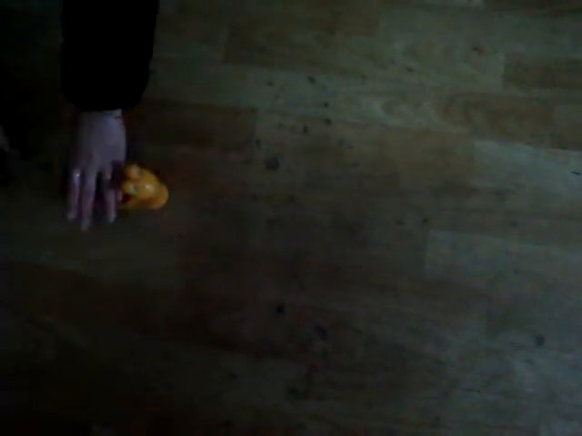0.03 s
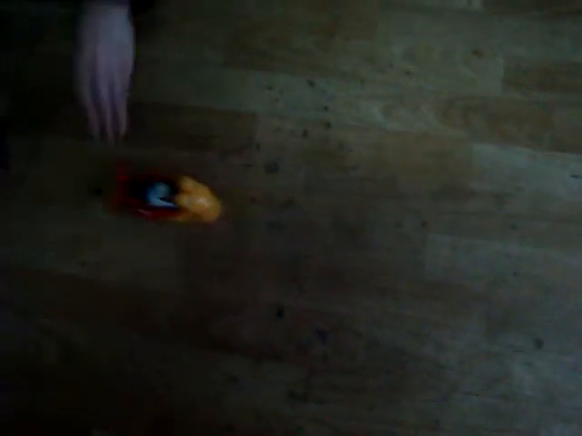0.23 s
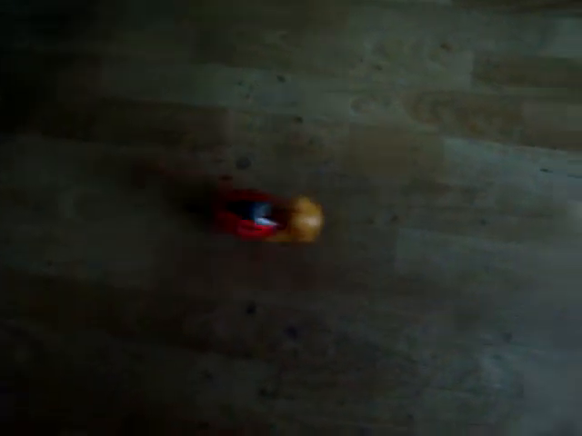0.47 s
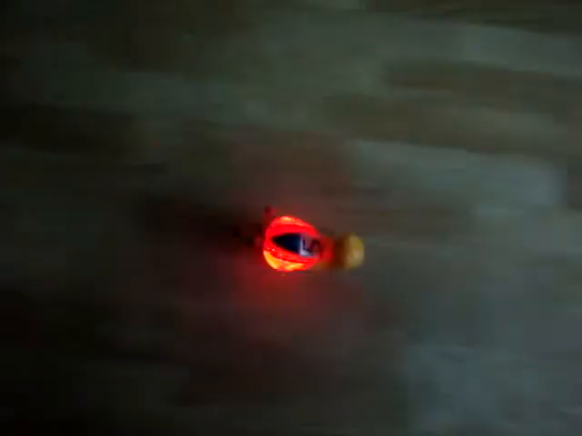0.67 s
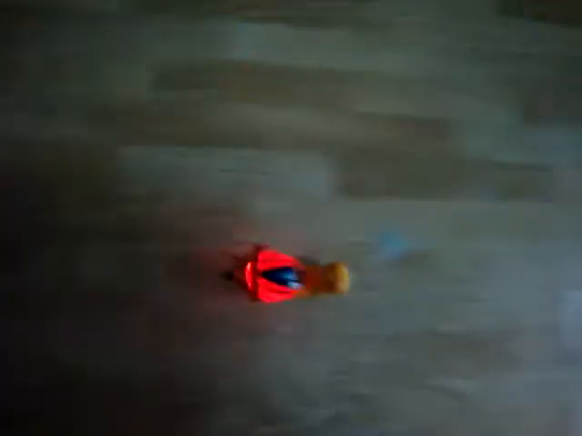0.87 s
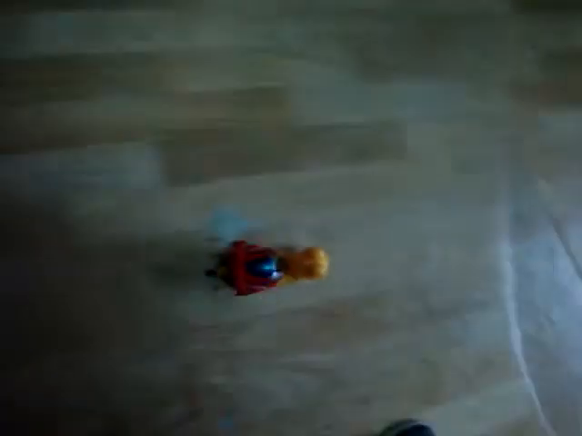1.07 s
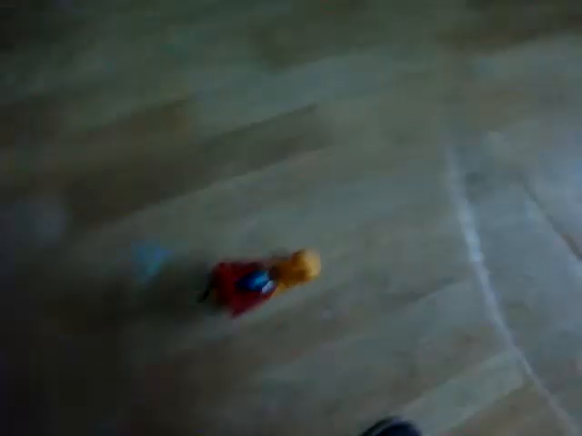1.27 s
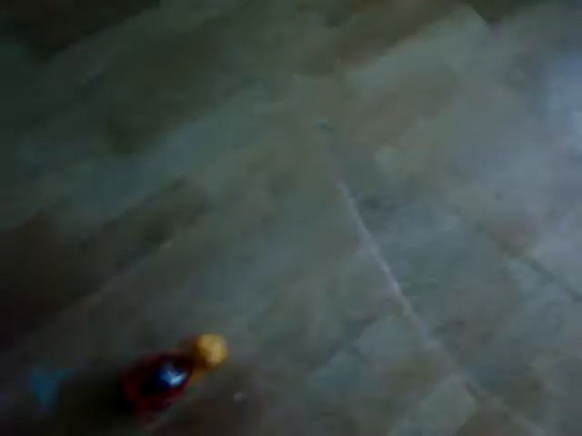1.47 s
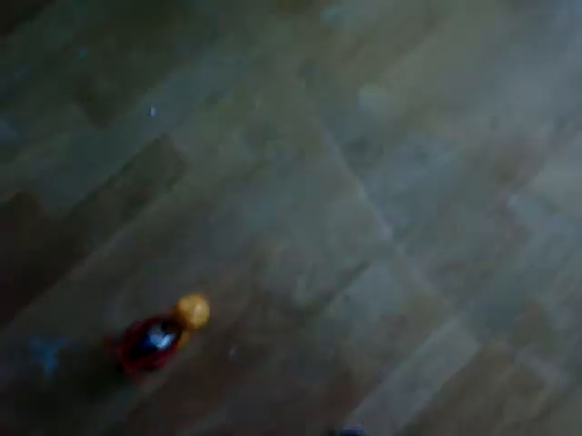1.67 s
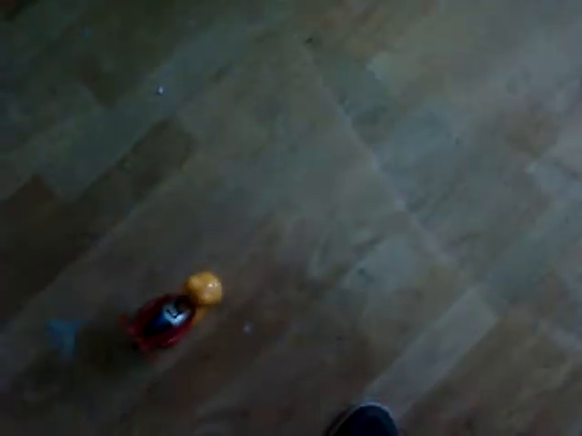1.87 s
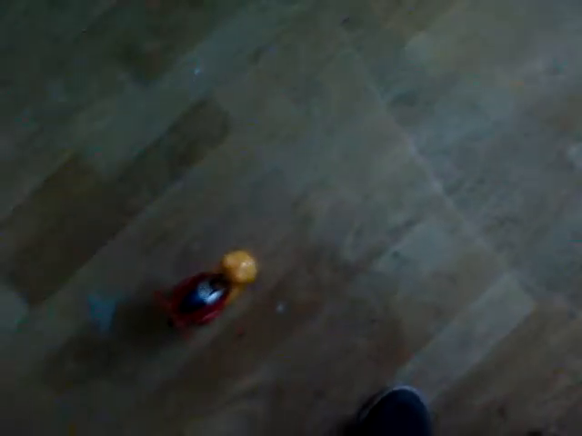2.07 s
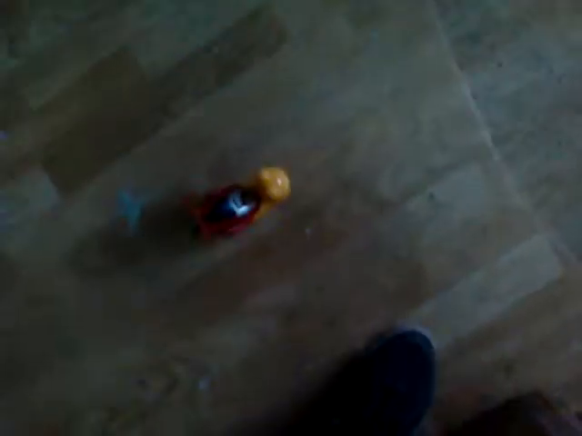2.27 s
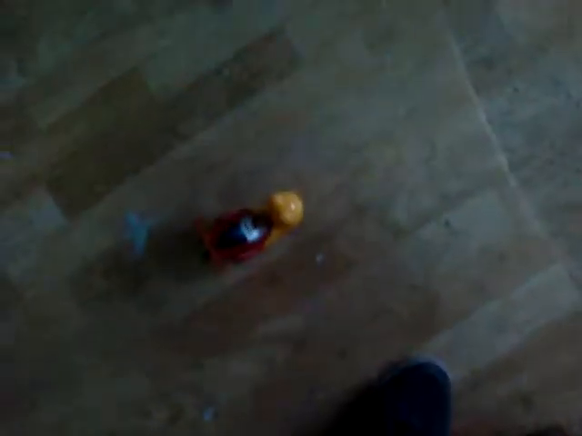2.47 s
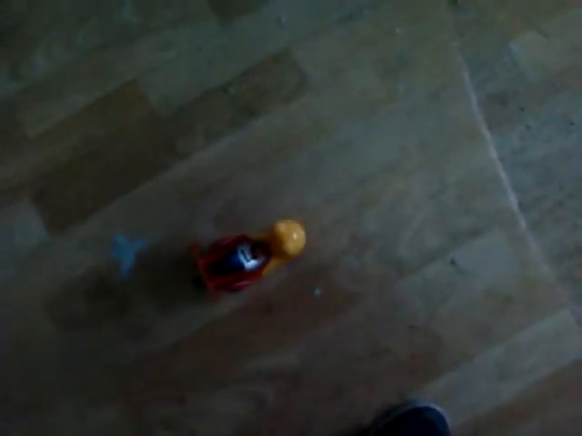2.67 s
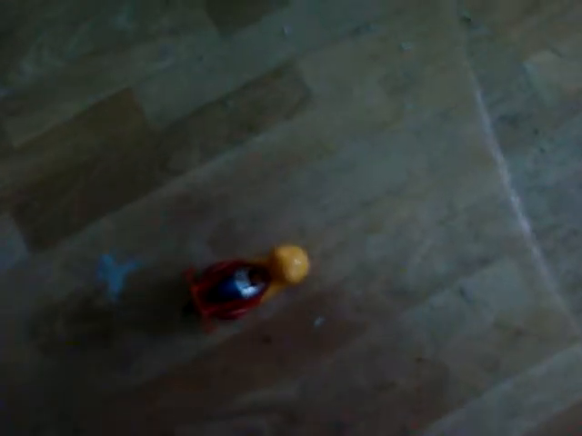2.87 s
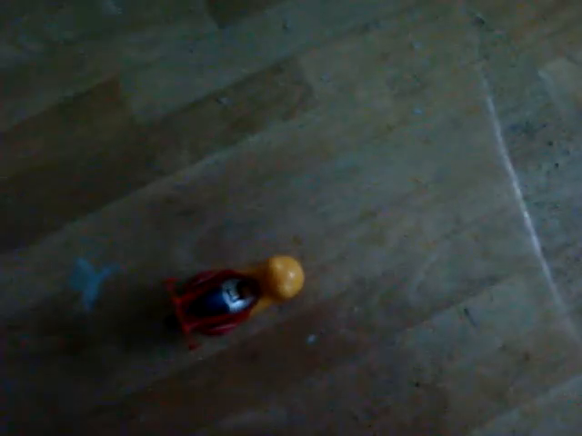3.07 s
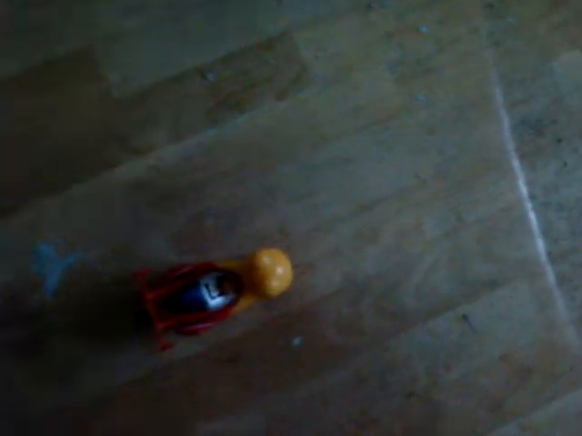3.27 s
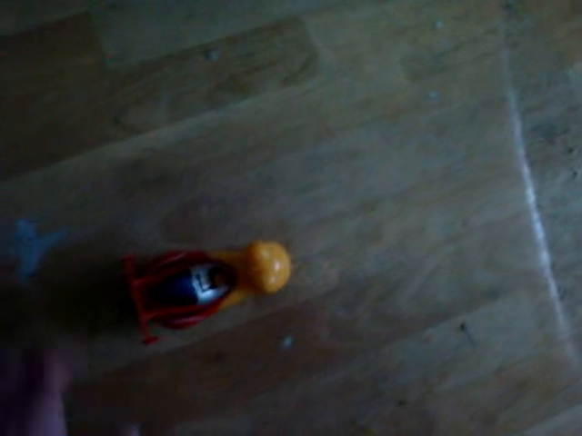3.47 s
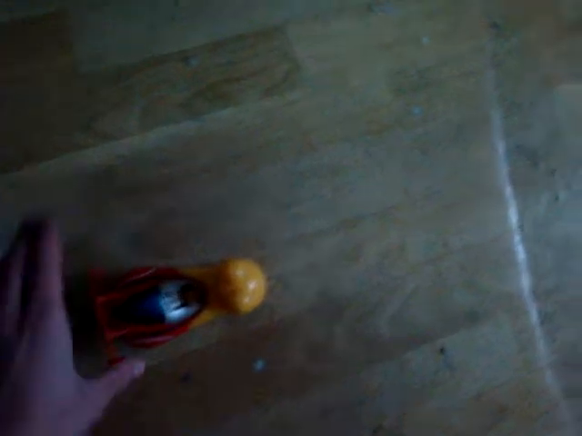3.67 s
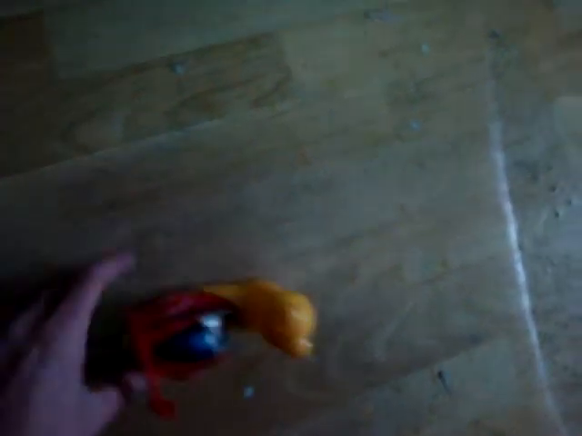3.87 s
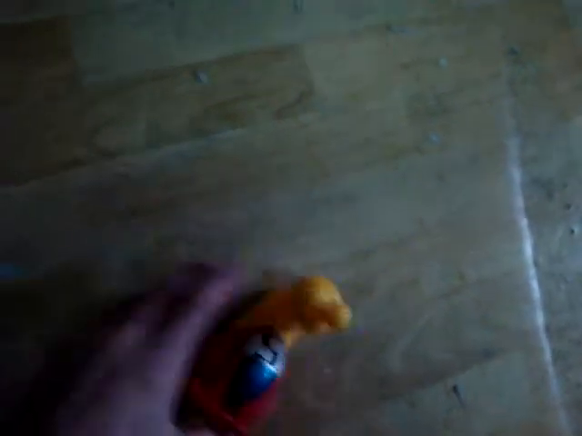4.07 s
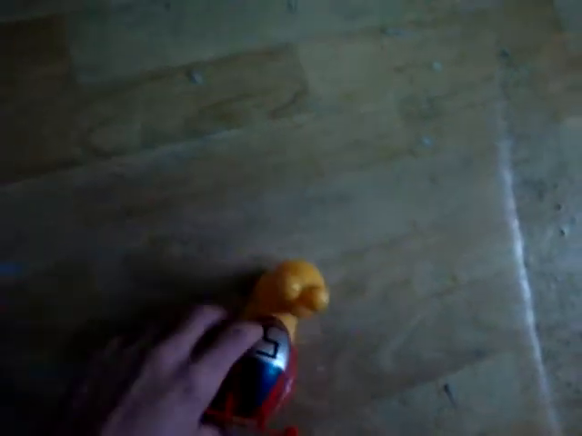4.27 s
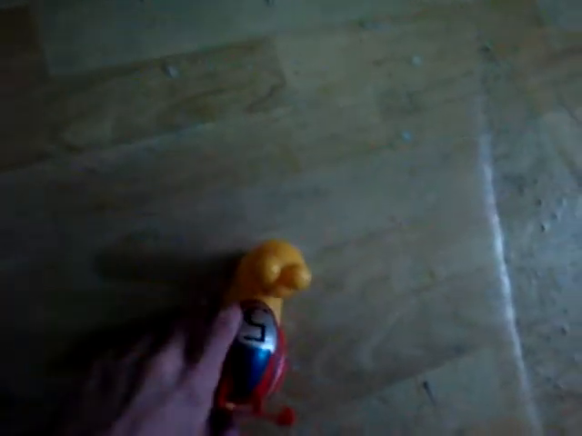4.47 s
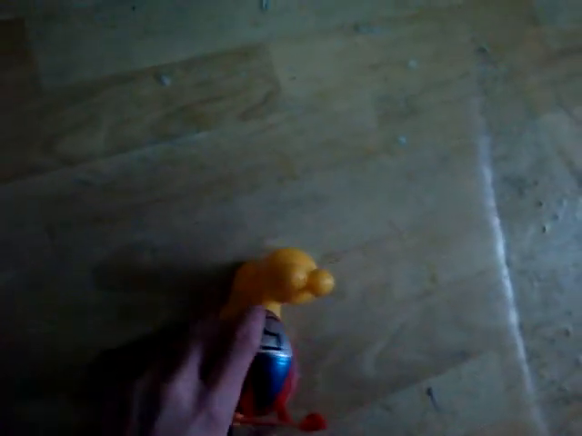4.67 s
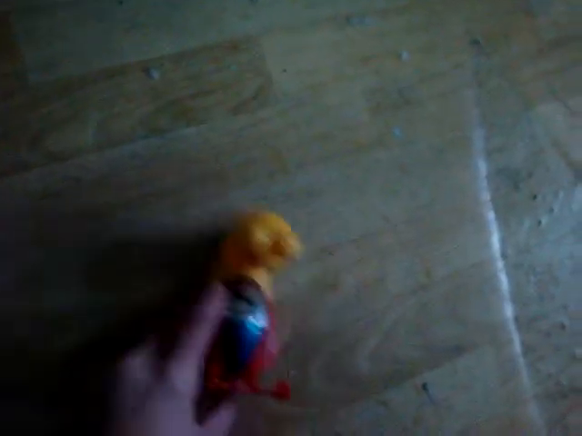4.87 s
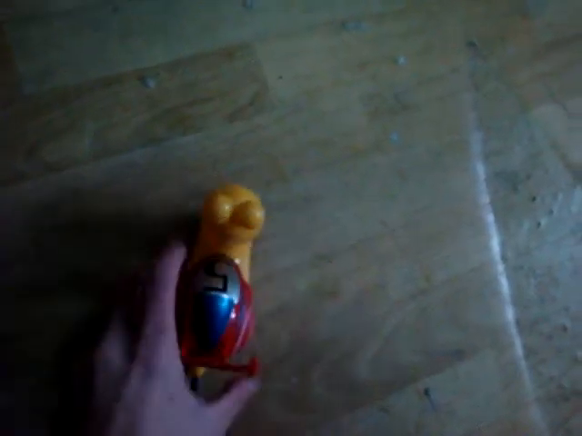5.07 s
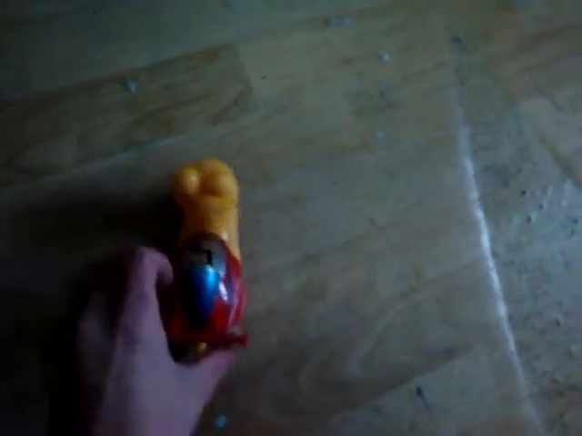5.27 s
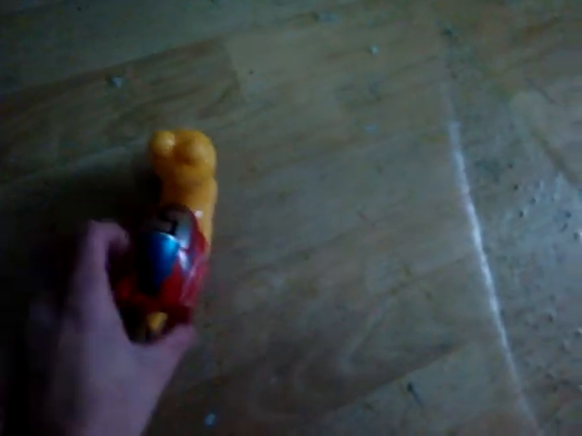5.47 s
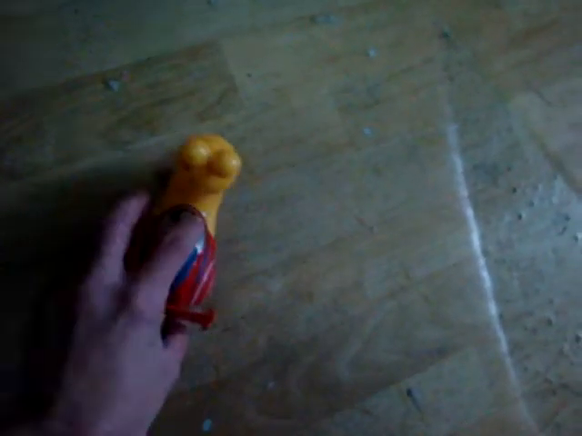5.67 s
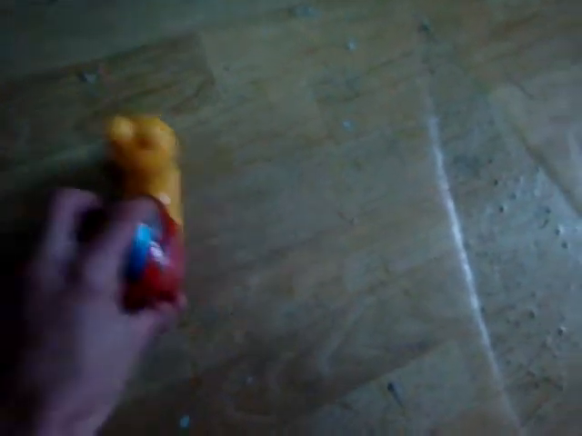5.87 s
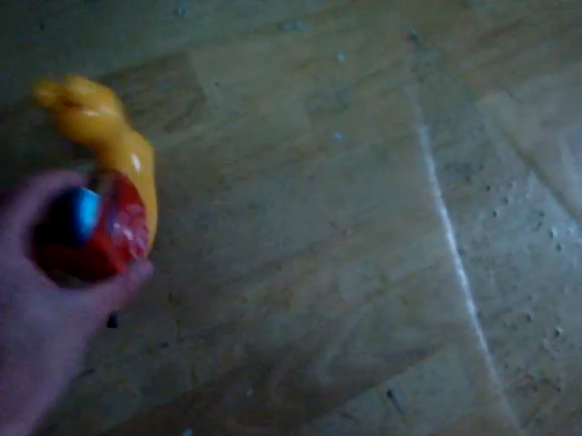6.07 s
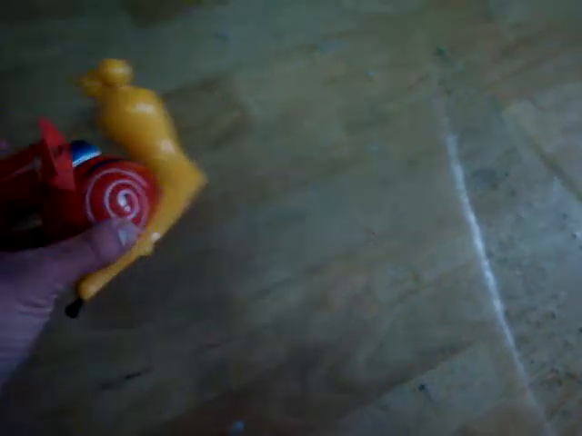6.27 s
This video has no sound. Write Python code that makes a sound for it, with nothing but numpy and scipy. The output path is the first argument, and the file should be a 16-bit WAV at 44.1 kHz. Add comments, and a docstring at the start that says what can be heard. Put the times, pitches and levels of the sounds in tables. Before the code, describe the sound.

A small plastic wind-up toy rattles across a hard floor and stops, then scrapes and taps as a hand turns it.

```python
"""A hollow plastic clockwork snail rattles over a laminate floor until its spring runs down.
The place is a small room, heard from a hand-held phone whose case ticks right at the microphone.
Someone steps after the toy, a sole scuffing and clothes rustling, then turns it by hand: it scrapes,
squeaks and taps the floor. The walls answer the toy briefly; the microphone is thin in the deep bass."""
import sys
import numpy as np
from scipy import signal
from scipy.fft import rfft, irfft, next_fast_len
from scipy.io import wavfile
from scipy.ndimage import map_coordinates

SR = 44100
rng = np.random.default_rng(int(sys.argv[2]) if len(sys.argv) > 2 else 0)


def to_wav(s):
    """Save 16-bit WAV."""
    ch = np.atleast_2d(s).T  # columns
    pcm = np.round(np.clip(ch, -1, 1) * 32767)  # PCM
    wavfile.write(sys.argv[1], SR, pcm.astype(np.int16))


N = 279594

# The toy is pushed off, speeds up and runs down. Each row: time in seconds, wheels in dB, gears in dB.
ROLL_LEVELS = [(0, -21.5, -24), (.1, -38.5, -41.5), (.2, -35.5, -45), (.3, -26, -40), (.39, -29.5, -43.5),
               (.48, -32, -32.5), (.57, -28.5, -30.5), (.72, -26.5, -26.5), (.88, -25, -27.5),
               (.96, -28, -23), (1.08, -28, -33), (1.19, -38, -35), (1.34, -39.5, -39), (1.43, -49.5, -49),
               (1.55, -60, -59)]
# The strongest hollow tone under the rolling toy. Each row: time in seconds, pitch in Hz.
WHIRR_PITCH = [(0, 800), (.2, 863), (.42, 850), (.53, 712), (.66, 794), (.8, 876), (.95, 885), (1.1, 1028),
               (1.5, 983)]
# Resonances of the toy. Each row: centre in Hz, width in Hz, level in dB.
SHELL_MODES = [(1550, 480, 6.5), (1960, 420, 9.5), (2358, 260, 7.5), (2690, 333, 11), (3016, 640, 7.5),
               (3484, 1240, 8), (4326, 480, -1.5)]  # the plastic shell
HOLLOW_MODES = [(691, 268, 3), (850, 252, 6), (1042, 374, 7), (1270, 510, 2.5)]  # the air inside it and the board under it
# Treble of the toy. Each row: frequency in Hz, spectral level in dB.
SMALL_PARTS_SPECTRUM = [(3500, -27.5), (4800, 0), (5800, 4.5), (7000, -0.5), (8500, -1), (10500, -7)]
TAP_SPECTRUM = [(3500, -33.5), (4700, 2.5), (5800, -2), (7500, -6), (10500, -16.5)]
# Wheels jolting over floor joints. Each row: time in seconds, peak in dB, hollow and treble against
# the shell in dB, shell colour in Hz, time to fall 60 dB in seconds.
WHEEL_JOLTS = [(0, -12, -1.5, -5.5, 2300, 0.066), (.022, -15, 4.5, -11, 2590, 0.066),
               (.058, -17.5, -17, -13.5, 2580, .06), (.088, -21.5, -10, -21, 3300, .04),
               (.109, -23, -11, -26, 3220, 0.027), (.145, -23, -11, -15.5, 1700, 0.029),
               (.255, -25.5, -0.5, -12, 3520, 0.055), (.298, -8, -7.5, -9, 2500, .05),
               (.329, -11, -15, -6, 2750, .015), (.385, -13.5, 0.5, -28, 2830, 0.064),
               (.401, -8, -14.5, -9, 2560, 0.05), (.446, -19.5, -8, -16, 2430, 0.047),
               (.495, -7, -19.5, -8, 2720, 0.061), (.515, -10, -3, -25, 2600, 0.029),
               (.54, -13, -7, -8, 2610, 0.047), (.566, -7.5, -6.5, -9.5, 2200, .045),
               (.664, -7.5, -12, -5.5, 2650, 0.088), (.687, -10, -5, -19.5, 2530, .09),
               (.737, -11.5, 2, -22, 2690, 0.073), (.811, -11.5, -13, -10.5, 3450, .06),
               (.824, -7.5, -2, -13.5, 2410, 0.062), (.87, -11, -12.5, -7.5, 2370, 0.072),
               (.919, -12.5, -11, -21, 2440, .05), (.954, -6, -15, -10.5, 2660, 0.062),
               (1.008, -16, -6, -10, 3600, 0.073), (1.046, -21, 0, -9, 1810, 0.093),
               (1.092, -13.5, -11, -14, 2670, 0.028), (1.114, -18.5, -12, -10, 2180, 0.025),
               (1.203, -19, -10, -16, 2640, .04), (1.214, -15, -5.5, -9.5, 1780, .04),
               (1.235, -16.5, -11, -15, 2700, .04), (1.266, -21, -11, -9, 1980, .04),
               (1.314, -24.5, -6, -9.5, 1940, .05)]
# The room's air and the microphone's hiss. Each row: frequency in Hz, spectral level in dB.
ROOM_TONE_SPECTRUM = [(15, -59.5), (25, -16), (59, -23), (250, -7), (322, -5.5), (436, -5.5), (507, -6),
                      (820, -8), (954, -8), (9770, -19.5), (10500, -77.5), (13700, -73.5), (22000, -120)]
# Reverberation of the small room. Each row: frequency in Hz, time to fall 60 dB in seconds.
WALL_DECAY = [(300, 0.14), (2000, 0.3), (9000, 0.015)]
# Low thuds: a soft step, the thump under sharp clicks, and dull knocks.
# Each row: start in seconds, level in dB, pitch in Hz, time to fall 60 dB in seconds.
LOW_THUDS = [(1.14, -50, 90, 0.047), (1.22, -55, 80, 0.16), (1.3, -50, 100, 0.089), (2.231, -33, 60, .01),
             (3.276, -40, 60, 0.014), (4.204, -29, 131, 0.01), (4.791, -35, 360, 0.031),
             (4.898, -27.5, 404, 0.022), (5.461, -29.5, 500, 0.035), (5.53, -29, 273, 0.032)]
# Squeaks of plastic, and a short hollow hum as the toy rolls.
# Each row: start and length in seconds, level in dB, first and last pitch in Hz.
SQUEAKS_AND_HUM = [(1.142, 0.067, -40, 4600, 4800), (4.029, 0.041, -44.5, 3620, 4200),
                   (4.89, 0.055, -34.5, 2780, 2720), (5.877, 0.089, -38, 859, 928)]
# A shoe sliding, and two spells of moving clothes. Each row: time in seconds, level in dB.
SCUFF_LEVELS = [(1.76, -71), (1.81, -47.5), (1.85, -53), (1.89, -47), (1.96, -60.5)]
RUSTLE_SPELLS = [
    [(2.7, -69), (2.8, -53), (3.02, -43.5), (3.34, -49.5), (3.5, -49), (3.86, -46), (4.0, -69)],
    [(6.02, -51), (6.09, -54.5), (6.18, -44.5), (6.34, -45.5)],
]
# Rubbing noise of sole and cloth. Each row: frequency in Hz, spectral level in dB.
SOLE_SPECTRUM = [(200, -25), (500, -3.5), (1500, -5.5), (3000, -9), (6000, -16), (10000, -22.5)]
CLOTH_SPECTRUM = [(88, -41), (150, -27), (358, -4.5), (436, -17), (476, -3.5), (856, 0), (6050, -4.5),
                  (9610, -12), (10500, -27), (13600, -57), (22000, -120)]
# Ticks of the phone case. Each row: time in seconds, peak in dB, low modes against high in dB.
CASE_TICKS = [(1.8193, -34, 0.5), (2.0247, -37, 5), (2.0959, -20, -7.5), (2.1264, -40.5, 4),
              (2.2363, -31.5, 8), (2.4134, -40, -4), (2.7496, -39, 0.5), (2.7716, -36, 6.5),
              (3.275, -16, -3), (3.683, -21.5, 2)]
# Resonances of the phone case. Each row: centre in Hz, width in Hz, level in dB.
CASE_LOW_MODES = [(1400, 890, -6.5), (3100, 1500, -4), (4650, 1230, 0)]
CASE_HIGH_MODES = [(5790, 1400, -11.5), (7140, 490, -4.5), (8230, 1100, -6.5), (9640, 540, -11)]
# Fingers dragging the toy. Each row: start, loudest moment and end in seconds, shell in dB, hollow in dB.
DRAG_STROKES = [(3.729, 3.868, 4.02, -47.5, -51), (4.319, 4.371, 4.46, -41.5, -45.5),
                (4.674, 4.74, 4.77, -53, -52), (4.764, 4.796, 4.855, -43, -43),
                (4.864, 4.95, 4.98, -38.5, -48.5), (5.044, 5.06, 5.04, -61, -43.5),
                (5.171, 5.221, 5.265, -47, -46.5), (5.259, 5.308, 5.4, -44, -47.5),
                (5.43, 5.462, 5.6, -45, -44), (5.597, 5.7, 5.77, -52.5, -46),
                (5.872, 5.946, 6.01, -47, -42)]
# The toy tapping floor and fingers. Each row: time in seconds, peak in dB, hollow and treble against
# the shell in dB, shell colour in Hz.
TOY_TAPS = [(3.865, -27.5, -5, -25, 2760), (3.88, -24.5, -3, -31, 2840), (3.999, -32, 8, -19, 1560),
            (4.009, -29, -5, -20, 3340), (4.09, -30, -12, -17, 3320), (4.167, -35.5, -3, -3.5, 1750),
            (4.201, -6, -4, -12, 1500), (4.222, -12, -6.5, -8.5, 3200), (4.246, -26.5, -5, -27, 2240),
            (4.255, -21.5, -7.5, -17, 2800), (4.524, -36, 5, -22, 1588), (4.544, -23.5, -4.5, -18.5, 3520),
            (4.617, -22, -8.5, -7.5, 2740), (4.868, -23.5, -10, -28, 2830), (4.897, -19, 0.5, -32, 2740),
            (4.974, -25.5, -4, -14, 2800), (5.031, -11.5, -4.5, -9.5, 2780), (5.05, -22.5, -2, -26, 2750),
            (5.06, -20.5, -5, -12.5, 3220), (5.077, -22.5, -7, -5, 3350), (5.101, -31, -6, -19, 1960),
            (5.278, -30.5, 4, -22, 2800), (5.413, -20.5, -2, -26, 2690), (5.447, -32.5, 7, -22, 3100),
            (5.674, -16, -25, 0.5, 3240), (5.716, -25.5, 1, -4, 1990), (5.735, -29, -10, -10, 1740),
            (5.888, -12, -6, -8.5, 3080), (5.902, -26.5, -6, -23.5, 2670), (5.982, -31.5, -9, -22, 2700),
            (6.002, -37, 1, -11, 3730)]


def amp(db):
    """dB to gain."""
    return 10 ** (np.asarray(db) / 20)


def unit(x):
    """Scaled to rms 1."""
    return x / np.sqrt(np.mean(x ** 2) + 1e-20)


def peaked(x):
    """Scaled to peak 1."""
    return x / np.abs(x).max()


def add(track, start, sound):
    """Mixes a sound in at start seconds."""
    part = track[round(start * SR):][:len(sound)]
    part += sound[:len(part)]


def along(points, hz):
    """Reads (Hz, value) points at hz, on a log frequency axis."""
    freqs, values = np.transpose(points)
    return np.interp(np.log(hz + 1), np.log(freqs + 1), values)


def curves(rows):
    """A gate open over the rows' span with 15 ms fades, then each column after the time, per sample."""
    times, *columns = np.transpose(rows)
    t = np.arange(N) / SR
    since_start = t - times[0] + (times[0] == 0)  # no fade at either edge of the scene
    until_end = times[-1] - t + (times[-1] > t[-1] - .02)
    gate = np.clip(np.minimum(since_start, until_end) / .015, 0, 1)
    return [gate] + [np.interp(t, times, column) for column in columns]


def filtered(x, response):
    """x passed through a complex frequency response."""
    size = next_fast_len(len(x) + 4096)
    return irfft(rfft(x, size) * response(np.fft.rfftfreq(size, 1 / SR)), size)[:len(x)]


def normed(response):
    """The response scaled so that white noise keeps its rms."""
    rms = np.sqrt(np.mean(np.abs(response(np.linspace(0, SR / 2, num=1000))) ** 2))
    return lambda f: response(f) / rms


def modes(table):
    """Causal sum of resonances in alternating sign, each passed twice so that the valleys stay dark."""
    def response(f):
        return sum((-1) ** k * amp(db) * (1j * f * width / (hz * hz - f * f + 1j * f * width)) ** 2
                   for k, (hz, width, db) in enumerate(table))
    return normed(response)


def colour(points):
    """A smooth response through (Hz, dB) points."""
    return normed(lambda f: amp(along(points, f)))


def shell_near(focus_hz, db_per_octave):
    """The shell's response with the modes close to focus_hz excited most."""
    return modes([(hz, width, db - db_per_octave * abs(np.log2(hz / focus_hz)))
                  for hz, width, db in SHELL_MODES])


def grit(per_second, spread_db, smooth):
    """Tiny impacts of uneven size over a smooth rubbing noise, rms 1."""
    hits = rng.random(N) < per_second / SR
    size, noise = rng.standard_normal((2, N))
    impacts = hits * np.sign(noise) * amp(spread_db * size)
    return unit(unit(impacts) + smooth * noise)


def flutter(rate):
    """A smooth random curve, rate knots a second."""
    return map_coordinates(rng.standard_normal(int(N * rate / SR) + 4), [np.arange(N) * rate / SR])


def burst(rise, t60, crack):
    """Noise that swells and dies (times in seconds), with one sharp blow just after first contact."""
    t = np.arange(SR // 8) / SR
    swell = (1 - np.exp(-t / max(rise, 1e-4))) ** 2
    out = swell * amp(-60 * t / t60) * rng.standard_normal(len(t))
    out[round(2 * rise * SR)] += crack
    return out


def knock(hollow_db, treble_db, colour_hz, rise, t60, crack, spectrum):
    """A blow shakes the hollow, the small parts and the shell modes near the struck spot's colour."""
    shell = filtered(burst(rise, t60, crack), shell_near(colour_hz, db_per_octave=9))
    hollow = filtered(burst(rise, 1.27 * t60, crack), modes(HOLLOW_MODES))
    treble = filtered(burst(rise, 1.1 * t60, crack), colour(spectrum))
    return peaked(shell + amp(hollow_db) * hollow + amp(treble_db) * treble)


def wheel_rumble():
    """Wheels shake the hollow; its strongest tone shifts as the toy passes over the boards."""
    whirr_width_hz, whirr_db = 120, 4
    _, pitch = curves(WHIRR_PITCH)
    wheels = grit(2500, spread_db=6.5, smooth=.61)
    whirr = np.zeros(N)
    for hz in np.geomspace(pitch.min(), pitch.max(), num=6):  # the glide fades from band to band
        closeness = amp(-60 * abs(np.log2(hz / pitch)))
        whirr += closeness * filtered(wheels, modes([(hz, whirr_width_hz, 0)]))
    return filtered(wheels, modes(HOLLOW_MODES)) + amp(whirr_db) * unit(whirr)


def gear_rattle():
    """Gear teeth shake the small parts and the shell, which rocks so that its modes take turns."""
    rock_db, floor_damping, small_parts_db = 2.5, 1.18, -8
    teeth = grit(2500, spread_db=5, smooth=.8)
    shell = np.zeros(N)
    for hz, width, db in SHELL_MODES:
        ring = filtered(teeth, modes([(hz, floor_damping * width, 0)]))
        shell += amp(db + rock_db * flutter(45)) * ring
    return unit(shell) + amp(small_parts_db) * filtered(teeth, colour(SMALL_PARTS_SPECTRUM))


def rolling():
    """Wheels and gears chatter unevenly across the floor until the spring runs down."""
    gate, wheels_db, gears_db = curves(ROLL_LEVELS)
    chatter = amp(1.4 * flutter(70))
    wheels, gears = unit(wheel_rumble()), gear_rattle()
    return gate * chatter * (amp(wheels_db + 1.3 * flutter(45)) * wheels + amp(gears_db) * gears)


def jolts():
    """Floor joints shake the loose parts; the longer a jolt rings, the more slowly it swells."""
    out = np.zeros(N)
    for start, db, hollow_db, treble_db, hz, t60 in WHEEL_JOLTS:
        jolt = knock(hollow_db, treble_db, hz, rise=.06 * t60, t60=t60, crack=3.14,
                     spectrum=SMALL_PARTS_SPECTRUM)
        add(out, start, amp(db) * jolt)
    return out


def room_tone():
    """Air and microphone hiss, nearly steady under everything."""
    return amp(-53.5 + .6 * flutter(2)) * filtered(rng.standard_normal(N), colour(ROOM_TONE_SPECTRUM))


def wall_reflections(sound):
    """A short room echo, its tail renewed every quarter second so no pitch keeps ringing."""
    step = round(.25 * SR)
    out = np.zeros(N)
    for start in range(0, N, step):
        hz, t, noise = signal.stft(rng.standard_normal(SR // 2), SR, nperseg=256)
        decay = amp(-60 * t / along(WALL_DECAY, hz)[:, None])  # each frequency dies at its own speed
        _, tail = signal.istft(noise * decay, SR, nperseg=256)
        delayed = np.pad(sound[start:start + step], (200, 0))
        add(out, start / SR, signal.fftconvolve(delayed, tail / np.linalg.norm(tail)))
    return out


def thuds():
    """A step, the thump under clicks and dull knocks: damped low tones with a soft start."""
    out, t = np.zeros(N), np.arange(SR // 4) / SR
    for start, db, hz, t60 in LOW_THUDS:
        envelope = amp(db - 60 * t / t60) * (1 - np.exp(-t * 12 / t60))
        add(out, start, envelope * np.sin(2 * np.pi * hz * t))
    return out


def squeaks_and_hum():
    """Short, rough, wavering glides: high ones are plastic squeaking, the low one the toy's hollow hum."""
    out = np.zeros(N)
    waver, roughness = 1 + .03 * flutter(300), amp(4.8 * flutter(250))
    for start, length, db, first_hz, last_hz in SQUEAKS_AND_HUM:
        progress = np.linspace(0, 1, num=round(length * SR))
        span = round(start * SR) + np.arange(len(progress))
        hz = (first_hz + (last_hz - first_hz) * np.sqrt(progress)) * waver[span]
        envelope = amp(db) * roughness[span] * np.sin(np.pi * progress)
        add(out, start, envelope * np.sin(2 * np.pi * np.cumsum(hz) / SR))
    return out


def scuff_and_rustle():
    """A sole slides on the floor, then cloth on cloth: smooth hiss with fine grain."""
    grain = amp(.43 * flutter(23)) * grit(4000, spread_db=2, smooth=4.4)
    scuff_gate, scuff_db = curves(SCUFF_LEVELS)
    scuff = scuff_gate * amp(scuff_db) * filtered(grain, colour(SOLE_SPECTRUM))
    cloth_gain = sum(gate * amp(db) for gate, db in map(curves, RUSTLE_SPELLS))
    return scuff + cloth_gain * filtered(grain, colour(CLOTH_SPECTRUM))


def phone_ticks():
    """The phone case gives short dry cracks right at the microphone."""
    out = np.zeros(N)
    for start, db, low_db in CASE_TICKS:
        high = filtered(burst(rise=.001, t60=.019, crack=4.1), modes(CASE_HIGH_MODES))
        low = filtered(burst(rise=.00059, t60=.019, crack=1.2), modes(CASE_LOW_MODES))
        add(out, start, amp(db) * peaked(high + amp(low_db) * low))
    return out


def dragging():
    """The shell slips over the laminate in grains; each stroke swells and fades, the main mode on top."""
    main_mode_hz = SHELL_MODES[3][0]
    start_db, end_db, small_parts_db = -5, -9.5, -17
    slips = grit(2000, spread_db=6.5, smooth=.78) * amp(2.1 * flutter(60))
    hollow = filtered(slips, modes(HOLLOW_MODES))
    shell = filtered(slips, shell_near(main_mode_hz, db_per_octave=4))
    shell += amp(small_parts_db) * filtered(slips, colour(SMALL_PARTS_SPECTRUM))
    out = np.zeros(N)
    for start, loudest, end, shell_db, hollow_db in DRAG_STROKES:
        gate, swell_db = curves([(start, start_db), (loudest, 0), (end, end_db)])
        out += gate * amp(swell_db) * (amp(hollow_db) * hollow + amp(shell_db) * shell)
    return out


def taps():
    """Turned by hand, the toy strikes floor and fingers with a fast rise and a sharp blow."""
    out = np.zeros(N)
    for start, db, hollow_db, treble_db, hz in TOY_TAPS:
        tap = knock(hollow_db, treble_db, hz, rise=.001, t60=.034, crack=4.9, spectrum=TAP_SPECTRUM)
        add(out, start, amp(db) * tap)
    return out


def scene():
    """The toy on the floor with the walls' answer; phone, thuds, shoe and clothes stay dry. Mono."""
    toy = rolling() + dragging() + jolts() + taps() + squeaks_and_hum()
    walls = amp(-16.5) * wall_reflections(toy)
    return (toy + walls + phone_ticks() + thuds() + scuff_and_rustle() + room_tone())[None]


def record(dry):
    """The phone's microphone squeezes the loudest peaks, loses the deep bass and cuts the top treble."""
    ceiling, knee = .48, 4
    bass_hz, top_hz = 25, 10150
    squeezed = dry[0] / (1 + np.abs(dry[0] / ceiling) ** knee) ** (1 / knee)
    return filtered(squeezed, lambda f: (1j * f / (bass_hz + 1j * f)) * (f < top_hz))[None]


dry = scene()
out = record(dry)
to_wav(out)
```